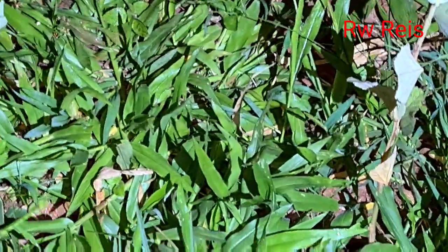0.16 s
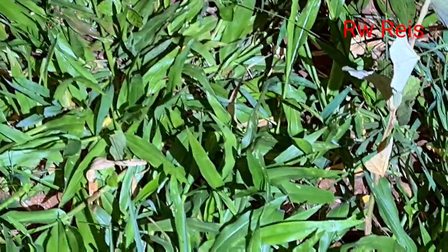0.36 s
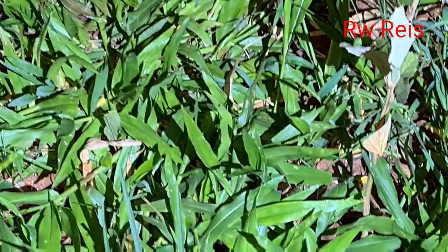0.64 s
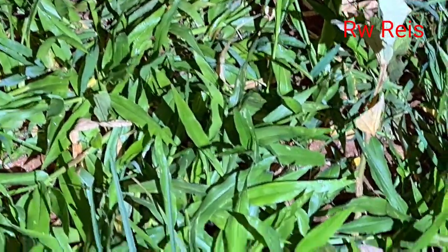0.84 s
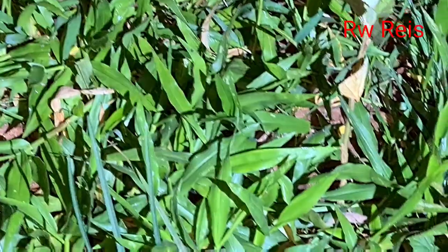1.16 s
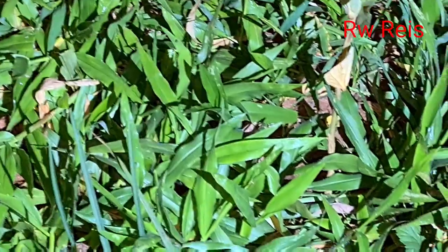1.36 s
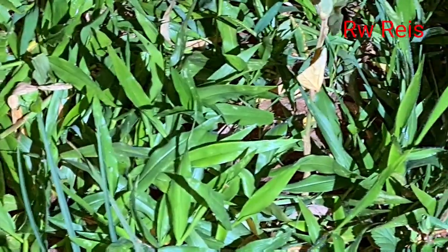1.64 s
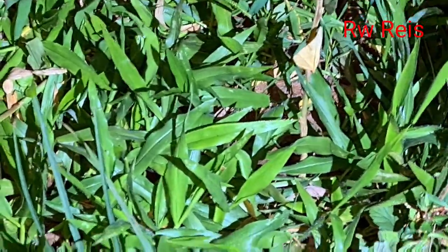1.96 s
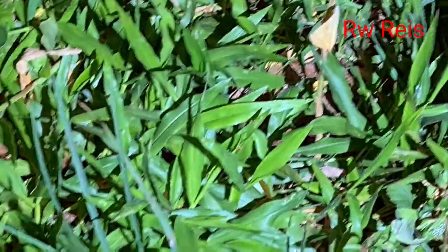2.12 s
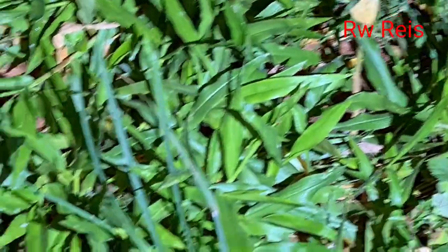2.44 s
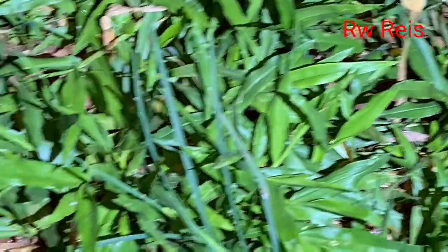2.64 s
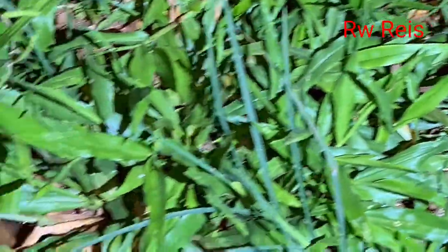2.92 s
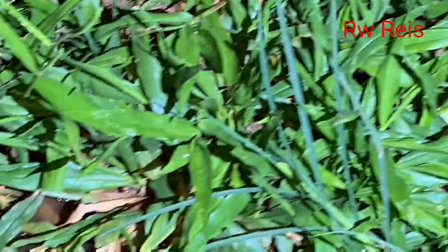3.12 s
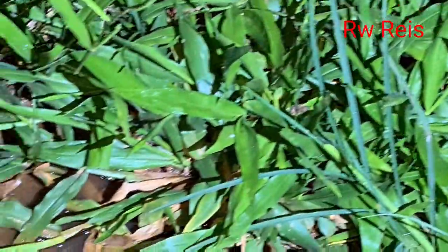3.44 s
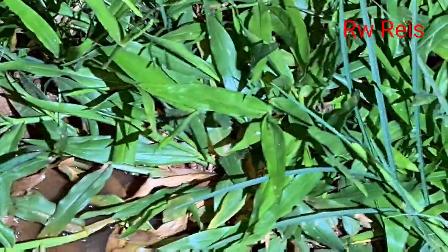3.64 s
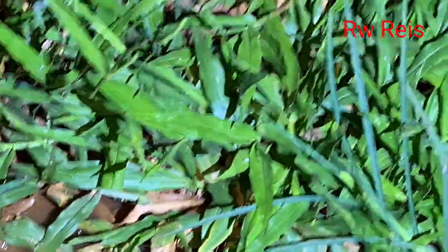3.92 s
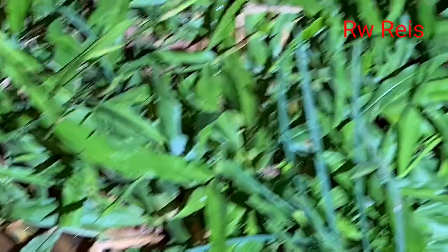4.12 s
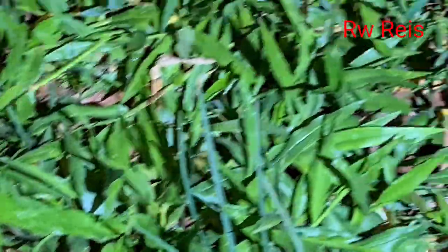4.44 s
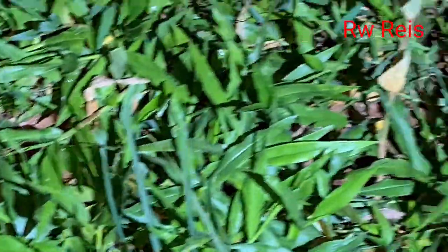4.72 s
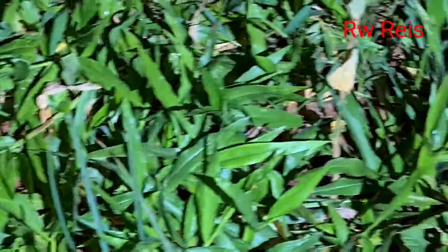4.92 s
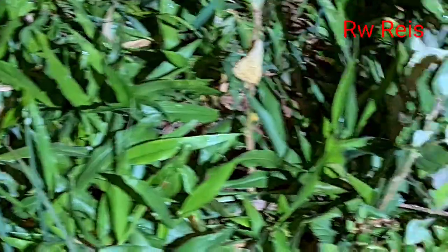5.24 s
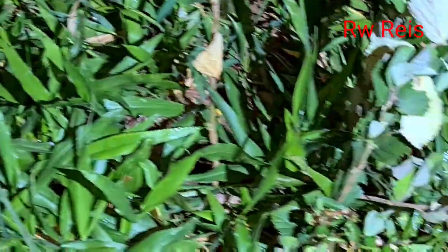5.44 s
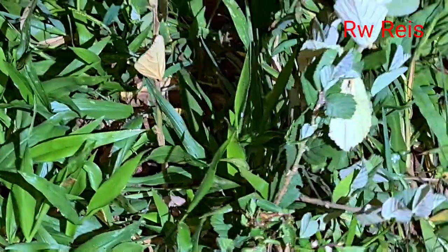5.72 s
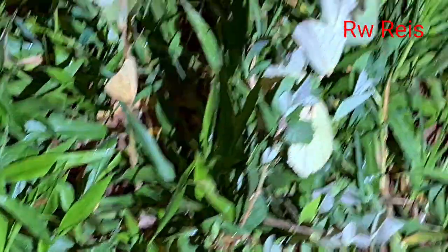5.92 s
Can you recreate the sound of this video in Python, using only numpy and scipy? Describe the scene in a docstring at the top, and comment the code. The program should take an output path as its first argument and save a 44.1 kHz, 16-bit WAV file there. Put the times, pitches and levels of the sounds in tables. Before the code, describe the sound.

Outdoors in grass, a steady high insect hiss and a rapid, raspy cricket run throughout. Distant frogs give faint short rising whistles and thin trills. A small frog very near the microphone whistles loudly upward at about three and a half seconds, then again, higher and stronger, just after five. A soft grass rustle comes early; a low rumble and wavering hum lie far beneath.

```python
"""A small frog close by gives two rising whistles: pure tones that glide up. Thin side tones flicker around
them. Other frogs answer from further off with fainter glides, and small callers add pulsed trills. A cricket
chirps eleven to twelve times a second: pulsed noise shaped by the tones of its wing. Behind them are a steady
insect chorus, the hush of air and grass rustles, all made of filtered noise, and a low distant rumble with a
wavering hum."""
import sys
import numpy as np
from scipy import signal
from scipy.fft import rfft, irfft, next_fast_len
from scipy.io import wavfile
from scipy.ndimage import uniform_filter1d, map_coordinates

SR = 44100
rng = np.random.default_rng(int(sys.argv[2]) if len(sys.argv) > 2 else 0)


def unload_audio(sound):
    """Save the sound as a 16-bit wav file, at the path given as the first command line argument."""
    columns = np.transpose(np.atleast_2d(sound))
    # keep every value between -1 and 1, then stretch to whole-number steps
    steps = np.round(np.clip(columns, -1, 1) * 32767)
    wavfile.write(sys.argv[1], SR, steps.astype(np.int16))


N = 267731
TIME = np.arange(N) / SR  # seconds


def amp(db):
    """Turn decibels into a gain."""
    return 10 ** (np.asarray(db) / 20)


def unit(x):
    """Scale to an average strength (rms) of 1."""
    return x / np.sqrt(np.mean(x ** 2) + 1e-20)


def along(points, hz):
    """Read a value between (f/Hz, value) points, on a log pitch axis."""
    f, v = np.transpose(points)
    return np.interp(np.log(hz + 1), np.log(f + 1), v)


def curves(rows):
    """Draw one line over time, straight between points, for each column after t/s."""
    t, *columns = np.transpose(rows)
    return [np.interp(TIME, t, column) for column in columns]


def wobble(rate):
    """A smooth random curve through this many random points a second."""
    points = rng.standard_normal(int(N * rate / SR) + 4)
    return map_coordinates(points, [TIME * rate])


def filtered(x, response):
    """Make each frequency of x stronger or weaker by the response."""
    m = next_fast_len(N + SR // 2)  # spare room at the end
    hz = np.fft.rfftfreq(m, 1 / SR)
    return irfft(rfft(x, m) * response(hz), m)[..., :N]


def coloured(x, spectrum):
    """Shape x with a (f/Hz, level/dB) spectrum, then scale it to rms 1."""
    return unit(filtered(x, lambda hz: amp(along(spectrum, hz))))


def noise(alike):
    """Stereo hiss; alike says how much left and right match, from 0 to 1."""
    turn = np.arccos(np.clip(alike, -1, 1)) / 2
    a, b = rng.standard_normal((2, N))
    return np.cos(turn) * a + np.sin(turn) * np.array([b, -b])


def pan(balance_db):
    """Left and right gains of constant total power; positive leans left."""
    pair = amp(np.array([[.5], [-.5]]) * balance_db)
    return pair / np.sqrt(np.mean(pair ** 2, axis=0))


def cycles(rate):
    """Add up a changing frequency in Hz into a phase in radians."""
    return 2 * np.pi * np.cumsum(rate) / SR


def swell(start, length):
    """A soft arch from 0 to 1 and back."""
    return np.sin(np.pi * np.clip((TIME - start) / length, 0, 1))


def bell(hz, centre_hz, width_hz):
    """A resonance curve: 1 at its centre, half at one width to either side."""
    return 1 / (1 + ((hz - centre_hz) / width_hz) ** 2)


def patchy(x, depth_db):
    """Raise and lower the level unevenly, in random patches of time and frequency."""
    z = signal.stft(x, nperseg=1024)[2]
    field = rng.standard_normal(z.shape[1:])
    field = uniform_filter1d(field, size=3, axis=0)  # across frequency
    field = uniform_filter1d(field, size=14, axis=1)  # across time
    return signal.istft(z * amp(depth_db * unit(field)), nperseg=1024)[1][:, :N]


# how long the scattered sound lasts: (f/Hz, time to fade by 60 dB/s)
SCATTER_TIME = [(300, .25), (1800, 0.33), (10000, 0.12)]


def grove(x):
    """Plants and ground scatter a short tail: noise that fades at its own speed in each band."""
    hz, t, z = signal.stft(rng.standard_normal((2, SR // 2)), SR, nperseg=256)
    fade = amp(-60 * t / along(SCATTER_TIME, hz)[:, None])
    tail = signal.istft(z * fade, SR, nperseg=256)[1]
    return signal.fftconvolve(x, tail / np.linalg.norm(tail[0]), axes=1)[:, :N]


# tone of the rumble: (f/Hz, relative level/dB)
RUMBLE_TONE = [(12, -38.5), (20, -13.5), (44, 1), (91, -5.5), (113, -5), (125, 2.5), (136, -6.5),
               (156, -10.5), (193, -14), (400, -28.5), (520, -63.5), (880, -120)]
# rumble over time, before gain_db: (t/s, level/dB)
RUMBLE_LEVEL = [(0, -65.5), (1, -68.5), (2.6, -65), (2.95, -61), (3.3, -62), (3.8, -59.5), (4.2, -64.5),
                (4.6, -64.5), (6.07, -68.5)]
# hum over time, before hum_gain_db and its waver: (t/s, level/dB)
HUM_LEVEL = [(.1, -61), (.42, -72), (1.2, -70.5), (2.4, -73), (2.92, -56), (3.35, -78), (3.67, -67.5),
             (5.15, -80), (5.5, -68.5), (6.07, -84.5)]


def rumble(gain_db=-0.1, hum_hz=126.3, hum_gain_db=-3.5, waver_db=2.6):
    """Deep filtered noise, with an unsteady pure tone as a hum that comes and goes."""
    level_db, = curves(RUMBLE_LEVEL)
    hum_db, = curves(HUM_LEVEL)
    hum_tone = np.sin(cycles(hum_hz * (1 + .02 * wobble(27))))
    hum = hum_tone * amp(hum_db + hum_gain_db + waver_db * wobble(6.2))
    return coloured(noise(alike=0.98), RUMBLE_TONE) * amp(level_db + gain_db) + hum


# tone of the high chorus, the low chorus and the open air: (f/Hz, relative level/dB)
HIGH_TONE = [(3600, -17), (4150, -0.5), (5100, -2.5), (5500, -2), (6100, 1.5), (6700, 8.5), (7250, 4),
             (8100, -21.5), (9200, -13.5), (9900, -22), (10600, -7), (11800, -28), (12900, -24),
             (13300, -45.5)]
LOW_TONE = [(2100, -50), (2550, -2), (2930, 0.5), (3130, -9), (3350, -3.5), (3700, -39.5), (4200, -37.5)]
AIR_TONE = [(150, 3.5), (400, -8), (800, -3), (1200, 2.5), (1700, -0.5), (2200, 2.5), (3600, -14),
            (8000, -15), (13000, -33.5)]
# each chorus over time, before its gain: (t/s, level/dB)
HIGH_LEVEL = [(0.0, -60.5), (0.39, -59), (2.91, -61.5), (3.57, -60), (4.83, -62.5), (5.24, -60.5),
              (6.07, -60.5)]
LOW_LEVEL = [(0.0, -65), (1.83, -64), (2.94, -68), (3.72, -64.5), (4.34, -70), (5.41, -62.5), (6.07, -65.5)]


def night(high_gain_db=8, low_gain_db=2, air_db=-67.5):
    """Two bands of far insects as patchy noise, and the hush of open air as smooth noise."""
    low_db, = curves(LOW_LEVEL)
    high_db, = curves(HIGH_LEVEL)
    high_crowd = patchy(noise(alike=0.036), depth_db=1.9)
    low_crowd = patchy(noise(alike=0.053), depth_db=1.9)
    high = coloured(high_crowd, HIGH_TONE) * amp(high_db + high_gain_db + .5 * wobble(12))
    low = coloured(low_crowd, LOW_TONE) * amp(low_db + low_gain_db + 1.1 * wobble(21))
    air = coloured(noise(alike=0.18), AIR_TONE) * amp(air_db + .6 * wobble(1))
    return high + low * pan(balance_db=-2.0) + air


# rustles in the grass: (start t/s, length/s, level/dB)
RUSTLES = [(1.438, 0.2, -60.5), (1.748, 0.013, -63)]


def rustles(grain_db=4):
    """Blades of grass brush each other: noise with a fast uneven level makes a fine crackle."""
    push = sum(amp(db) * swell(start, length) for start, length, db in RUSTLES)
    crackle = noise(alike=0.94) * amp(grain_db * wobble(600))
    tone = [(500, -15), (1800, -8.5), (4600, 4), (8000, -20), (13000, -12.5)]  # (f/Hz, level/dB)
    return push * coloured(crackle, tone)


# repeated short trills: (first t/s, no start from t/s, every/s, length/s, f/Hz, level before pulsing/dB)
TRILLERS = [(2.359, 4, .51, 0.081, 3350, -62), (2.78, 5.6, 1.208, .075, 5000, -56.5)]
# long thin trills: (start t/s, length/s, f/Hz, level before pulsing/dB)
LONG_TRILLS = [(-.2, 1.3, 3460, -69.5), (1.198, 1.25, 2980, -65), (4.4, 0.236, 3305, -65)]


def trills(pulse_hz=45, depth=0.39):
    """Faint pulsed notes, each on one unsteady pitch: short ones repeat evenly, long ones come once."""
    notes = list(LONG_TRILLS)
    for first, until, every, length, hz, db in TRILLERS:
        notes += [(start, length, hz, db) for start in np.arange(first, until, every)]
    out = np.zeros((2, N))
    for start, length, hz, db in notes:
        pulses = 1 + depth * np.cos(2 * np.pi * pulse_hz * (TIME - start - length / 2))
        tone = np.sin(cycles(hz * (1 + 0.015 * wobble(400))))
        out += amp(db) * swell(start, length) * pulses * tone
    return out


# the cricket over time, before rasp_db and ring_db: (t/s, level/dB)
CRICKET_LEVEL = [(0.0, -54), (0.32, -48.5), (1.01, -55.5), (2.04, -53.5), (3.01, -59), (3.09, -53.5),
                 (4.18, -54), (4.29, -59.5), (4.95, -50.5), (5.29, -56.5), (5.38, -52.5), (5.7, -54),
                 (6.02, -53.5), (6.07, -50.5)]
# the cricket's pace: (from t/s, chirps per second)
CRICKET_PACE = [(0, 11.6), (1.32, 11.2), (1.94, 11.9), (4.13, 11.4), (5.27, 11.1)]
# tone of the rasp, and the wing's main resonance: (f/Hz, relative level/dB)
RASP_TONE = [(5600, -34.5), (6020, -11), (6150, -5), (6400, -2), (6750, 4), (7200, -1), (7500, -19),
             (8100, -49.5), (9900, -29), (10450, -12), (11100, -17.5), (11600, -42), (12900, -27),
             (13300, -48)]
WING_TONE = [(6430, -26.5), (6570, 14.5), (6660, -4.5), (6780, -4), (7000, -36.5)]


def cricket(stroke_hz=100, stroke_depth=0.54, gap=0.087, rasp_db=-1, ring_db=-3):
    """Wing strokes, about a hundred a second, come in short chirps; they ring the wing and rasp around it."""
    level_db, = curves(CRICKET_LEVEL)
    since, pace = np.transpose(CRICKET_PACE)
    pace_now = pace[np.searchsorted(since, TIME, "right") - 1]
    beat = np.cumsum(pace_now) / SR - .3  # counted in chirps
    from_gap = np.abs(beat - np.round(beat))
    chirp = np.clip((from_gap - gap / 2) / 0.18, 0, 1)  # gap and ramps are shares of one chirp
    strokes = chirp * np.exp(stroke_depth * np.cos(cycles(stroke_hz * (1 + .03 * wobble(12)))))
    rasp = coloured(noise(alike=0.12) * strokes, RASP_TONE) * pan(balance_db=-1.5)
    ring = coloured(noise(alike=0.071) * strokes, WING_TONE) * pan(balance_db=-7.5)
    return (amp(rasp_db) * rasp + amp(ring_db) * ring) * amp(level_db + 0.44 * wobble(33))


# far frogs' whistles: (start t/s, end t/s, start f/Hz, end f/Hz, peak level before flicker/dB)
FAR_FROGS = [(.09, 0.246, 1180, 1960, -59.5), (0.451, 0.654, 1083, 2090, -64.5),
             (1.275, 1.421, 1270, 1975, -57), (1.898, 1.994, 1300, 1864, -68),
             (2.408, 2.642, 1040, 1860, -62.5), (2.938, 3.143, 1150, 2153, -58.5),
             (3.332, 3.493, 1286, 2080, -64), (3.945, 4.123, 1114, 2070, -59.5),
             (4.917, 5.07, 1240, 2080, -65)]


def far_frogs(peak_at=0.64, bend=1.15, fullness=0.92, lead_rad=-0.75, balance_db=1.0, flicker_db=3.0):
    """The same upward glide from afar, swelling unevenly to its loudest past the middle."""
    out = np.zeros((2, N))
    for start, end, low_hz, high_hz, db in FAR_FROGS:
        u = np.clip((TIME - start) / (end - start), 0, 1)  # progress through the call
        waver = 1 + .004 * wobble(66)
        phase = cycles((low_hz + (high_hz - low_hz) * u ** bend) * waver)
        arch = np.interp(u, [0, peak_at, 1], [0, 1, 0]) ** fullness
        effort = arch * amp(db + flicker_db * wobble(45))
        tone = np.sin(phase + np.array([[lead_rad], [0]]))
        out += effort * pan(balance_db) * np.sqrt(2) * tone
    return out


# side tones around the whistle, before gain_db and flicker: (multiple of the spacing, level/dB)
SIDE_TONES = [(1, -48), (2, -52), (3, -29), (4, -50), (5, -50), (6, -35), (7, -48), (8, -54), (9, -40),
              (10, -48), (11, -53)]


def side_tones(voice, spacing_hz=1296.3, gain_db=-1.06, fuzz_db=-47, flicker_db=2.0):
    """Thin, flickering tones evenly spaced above and below the whistle, with fuzz that follows its loudness."""
    phase = 2 * np.pi * spacing_hz * TIME
    tones = 0  # multiplying the voice by a cosine makes one tone above it and one below
    for k, db in SIDE_TONES:
        strength = 2 * amp(db + flicker_db * wobble(90))
        tones = tones + strength * np.cos(k * phase + rng.uniform(0, 2 * np.pi))
    fuzz_tone = [(300, -3.0), (1400, 5.0), (2500, 10.0), (4500, -10.5), (11000, -20.0)]  # (f/Hz, level/dB)
    fuzz = coloured(noise(alike=0.86), fuzz_tone)
    return voice * (amp(gain_db) * tones + amp(fuzz_db) * fuzz)


START_HZ, HOLD_S = 844, 0.027  # every whistle starts on this pitch and holds it before the climb
STEP_HZ, STEP_S, STEP_AT = 87.7, .005, .58  # a quick extra rise, placed as a share of the lead-in
LEAD_DB, LEAD_SKEW, OVERLAP_S = -24, 1.54, 0.031  # the soft lead-in peaks late and runs into the main note
LEAD_BEND, RELEASE_BEND = 1.7, 1.8  # curvature of the lead-in and of the release
SAC_DB, SAC_WIDTH_HZ = 4.5, 75  # lift as the pitch crosses the vocal sac's resonance
# the near frog's whistles: (start t/s, lead-in/s, attack/s, hold/s, release/s, climb/Hz per s,
# main note level before the sac's lift/dB, sac resonance f/Hz, left phase lead/rad)
WHISTLES = [(3.442, 0.11, 0.07, 0.031, 0.055, 3783, -16, 1533, -1.38),
            (5.249, 0.093, 0.027, 0.12, 0.04, 4560, -14.5, 1854, -.55)]
# each whistle's place between the ears, one list a whistle: (t/s, left over right level/dB)
SWAY = [
    [(3.46, 7.5), (3.484, -3.5), (3.564, 3), (3.604, -2), (3.648, 0.5), (3.7, 10.5)],
    [(5.27, -3), (5.296, -1.5), (5.382, 3.0), (5.448, -2.5), (5.478, 1), (5.52, -4.5)],
]


def whistle(row, sway, jitter=.0015, overtone_db=-23, overtone_hz=2800, overtone_width_hz=230,
            lead_overtone_db=-38):
    """One pure tone glides up as the larynx tightens: a soft lead-in, then the loud main note."""
    start, lead_s, attack_s, hold_s, release_s, climb, level_db, sac_hz, lead_rad = row
    t = np.maximum(TIME - start, 0)
    length = lead_s + attack_s + hold_s + release_s
    step = (1 + np.tanh((t - STEP_AT * lead_s) / STEP_S)) / 2
    hz = START_HZ + climb * (np.clip(t, HOLD_S, length) - HOLD_S) + STEP_HZ * step

    arch = np.abs(np.sin(np.pi * np.minimum(t / (lead_s + OVERLAP_S), 1) ** LEAD_SKEW))
    lead_in = amp(LEAD_DB) * arch ** LEAD_BEND
    attack = np.clip((t - lead_s) / attack_s, 0, 1)
    release = np.clip((length - t) / release_s, 0, 1) ** RELEASE_BEND
    note = attack * release * amp(level_db + SAC_DB * bell(hz, sac_hz, SAC_WIDTH_HZ))
    effort = uniform_filter1d((lead_in + note) * amp(0.27 * wobble(150)), size=200)  # soften corners

    phase = cycles(hz * (1 + jitter * wobble(150))) + np.array([[lead_rad], [-lead_rad]]) / 2
    # the octave tinges the lead-in, grows with effort and stands out at an upper resonance of the sac
    upper_resonance = bell(2 * hz, overtone_hz, overtone_width_hz)
    octave = amp(lead_overtone_db) * lead_in + amp(overtone_db) * effort ** 2 * upper_resonance
    balance_db, = curves(sway)
    voice = effort * np.sin(phase) + octave * np.sin(2 * phase)
    return pan(balance_db) * np.sqrt(2) * voice


def scene():
    """The near frog is almost without scattered sound; the far callers carry more of it."""
    background = rumble() + night() + rustles()
    far = trills() + far_frogs()
    near = sum(whistle(row, sway) for row, sway in zip(WHISTLES, SWAY))
    scattered = grove(amp(-39.5) * near + amp(-9) * far)
    return background + far + cricket() + scattered + side_tones(near) + near


def record(dry, top_hz=13200):
    """Keep only the frequencies below the band limit."""
    return filtered(dry, lambda hz: hz < top_hz)


dry = scene()
out = record(dry)
unload_audio(out)
```